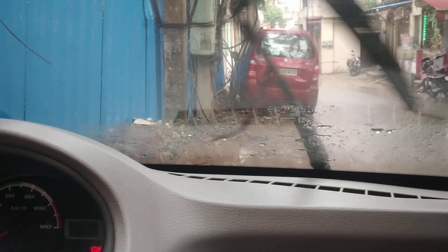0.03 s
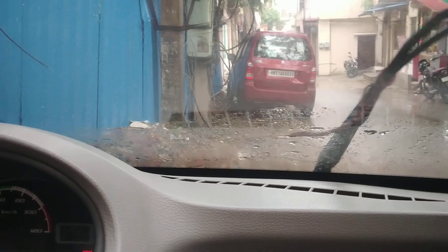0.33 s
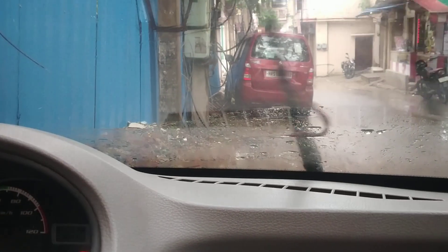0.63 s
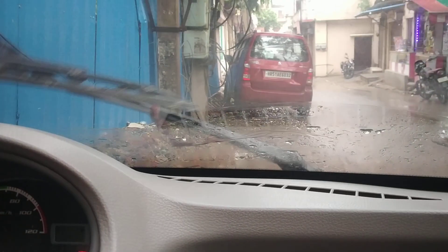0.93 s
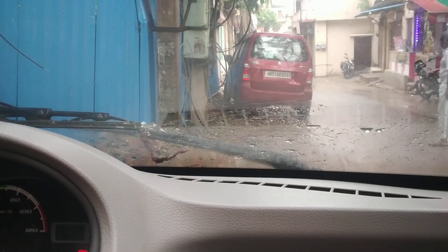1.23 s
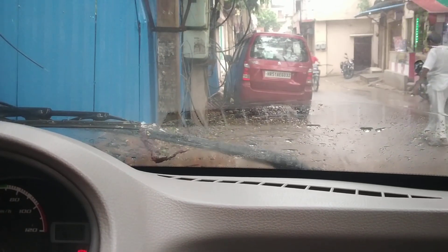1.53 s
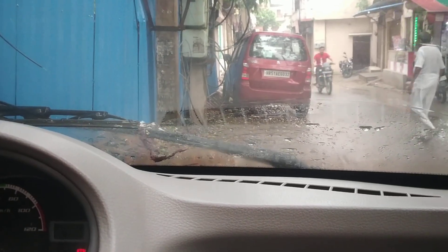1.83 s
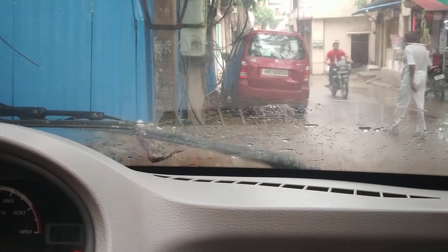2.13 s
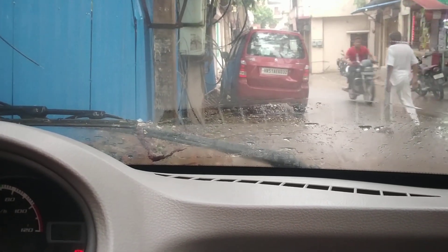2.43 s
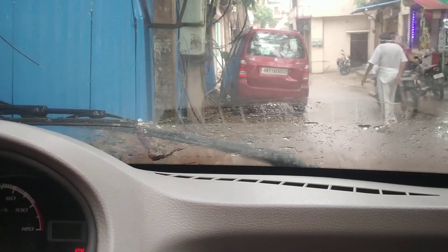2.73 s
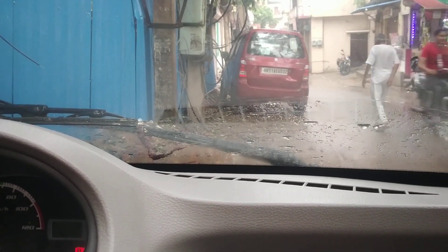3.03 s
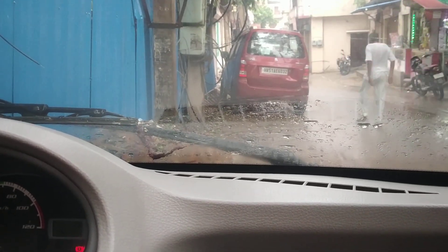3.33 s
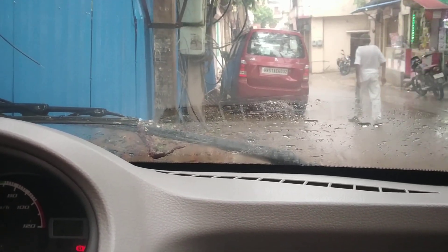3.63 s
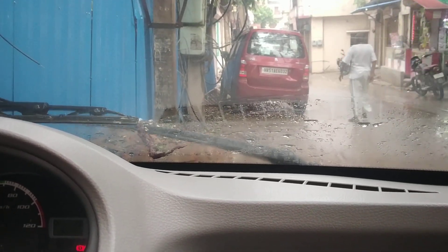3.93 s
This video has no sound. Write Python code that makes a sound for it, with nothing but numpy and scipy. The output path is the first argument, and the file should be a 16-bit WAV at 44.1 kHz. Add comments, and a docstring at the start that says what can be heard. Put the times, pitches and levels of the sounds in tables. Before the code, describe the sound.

Wiper rubber squeaks and groans across the glass and back, then stops, leaving low cabin hum.

```python
"""Squeals, groans and judders: wipers sweep up and down once on a nearly dry windscreen, heard in a parked car.
The rubber squeals while it runs fast, groans as it slows and keeps sticking and slipping,
and judders to a halt at each end. The cabin hums throughout; after the sweep come
a few soft knocks and faint chirps from outside."""
import sys
import numpy as np
from scipy import signal
from scipy.fft import rfft, irfft
from scipy.io import wavfile

SR = 44100
rng = np.random.default_rng(int(sys.argv[2]) if len(sys.argv) > 2 else 0)


def generate_wav(signal):
    """Clip the signal to [-1, 1] and save it as 16-bit WAV at the path in sys.argv[1]."""
    frames = np.transpose(np.atleast_2d(signal))
    scaled = np.clip(frames, -1, 1) * 32767
    pcm = np.round(scaled).astype(np.int16)
    wavfile.write(sys.argv[1], SR, pcm)


N = 176400
T = np.arange(N) / SR
HZ = np.fft.rfftfreq(N, 1 / SR)
TOP_HZ = 15800

# where the rubbing and the cabin sounds sit (frequency [Hz], left minus right [dB])
RUB_BALANCE = [(200, -6.5), (1200, -0.5), (2200, -3), (4400, 7), (8000, 10)]
CABIN_BALANCE = [(60, 2), (180, -5), (550, -6.5), (1650, 2), (4970, 3.5), (15000, -14.5)]


def amp(db):
    """Turns decibels into a gain."""
    return 10 ** (np.asarray(db) / 20)


def unit(x):
    """Scales a signal to an average power of 1."""
    return x / np.sqrt(np.mean(x ** 2) + 1e-20)


def read(points, hz):
    """Looks up a value between a table's frequencies, on a log scale."""
    f, value = np.transpose(points)
    return np.interp(np.log(hz + 1), np.log(f + 1), value)


def place(x, balance):
    """Shares each frequency between left and right, keeping its total power."""
    gains = amp(read(balance, HZ) * np.array([[.5], [-.5]]))
    gains /= np.sqrt(np.mean(gains ** 2, 0))
    return irfft(rfft(x) * gains, N)


def noise(tone):
    """Noise of power 1, shaped by (frequency [Hz], level [dB]) points."""
    return unit(irfft(rfft(rng.standard_normal(N)) * amp(read(tone, HZ)), N))


def wander(rate_hz):
    """A smooth random wobble of power 1, mostly slower than rate_hz."""
    return unit(irfft(rfft(rng.standard_normal(N)) / (1 + (HZ / rate_hz) ** 4), N))


def follow(rows):
    """The samples a table covers, and its columns as curves over them."""
    times, *columns = np.transpose(rows)
    span = slice(max(int(times[0] * SR), 0), int(times[-1] * SR))
    return span, [np.interp(T[span], times, column) for column in columns]


def level(rows):
    """Gain along (time [s], level [dB]) points, silent after the last."""
    return amp(np.interp(T, *np.transpose(rows), right=-150))


def phase_of(hz):
    """Adds up a changing pitch into a wave's angle, in radians."""
    return 2 * np.pi * np.cumsum(hz) / SR


def add(mix, start_s, sound):
    """Adds a sound into the mix at a given time."""
    part = mix[round(start_s * SR):][:len(sound)]
    part += sound[:len(part)]


def panel(x, lowest_hz=140):
    """Stiff panels give off little sound below their lowest note."""
    return signal.sosfilt(signal.butter(5, lowest_hz, "highpass", fs=SR, output="sos"), x)


def from_left(pair, delay_s=.00021):
    """Sound from the left reaches the right side later, by at most a quarter of a wave."""
    lag = np.minimum(2 * np.pi * HZ * delay_s, np.pi / 2)
    return np.array([pair[0], irfft(rfft(pair[1]) * np.exp(-1j * lag), N)])


def reflections(x, ring_s=.075):
    """Glass and trim throw back a dense, very short echo."""
    # echo colour (frequency [Hz], level [dB])
    tone = [(200, -10), (620, -18), (1300, -9), (2700, -4.5), (4500, 2), (15000, 4)]
    t = T[:SR // 4]
    echoes = rng.standard_normal((2, len(t))) * amp(-60 * t / ring_s) * (t > .001)
    echoes /= np.linalg.norm(echoes, axis=1, keepdims=True)
    coloured = irfft(rfft(x) * amp(read(tone, HZ)), N)
    return signal.fftconvolve(coloured, echoes, axes=1)[:, :N]


def cabin_hum(level_db=-40.5):
    """The closed car holds a steady low rumble and a thin hiss."""
    # hum colour (frequency [Hz], level [dB])
    tone = [(25, -35), (96, -32), (133, -10.5), (228, 0), (275, -1.5), (340, -10.5), (390, -4.5),
            (484, -12), (765, -17.5), (1120, -23.5), (1720, -29), (4290, -35), (11600, -39.5), (13300, -27),
            (15600, -39)]
    # how alike left and right are (frequency [Hz], likeness [0-1])
    likeness = [(60, 0.41), (180, 1), (550, 0.53), (1650, 0.032), (15000, 0.037)]
    left, other = noise(tone), noise(tone)
    same = np.clip(read(likeness, HZ), -1, 1)
    right = irfft(same * rfft(left) + np.sqrt(1 - same ** 2) * rfft(other), N)
    return amp(level_db + .25 * wander(rate_hz=35)) * place(np.array([left, right]), CABIN_BALANCE)


def chirps(count=6, start_s=2.445, every_s=.259, length_s=.08, start_hz=4600, fall_hz=700, db=-66):
    """Faint falling chirps repeat somewhere outside."""
    out, t = np.zeros(N), np.arange(0, length_s, 1 / SR)
    for k in range(count):
        hz = start_hz - fall_hz * t / length_s + 200 * wander(rate_hz=300)[:len(t)]
        add(out, start_s + k * every_s, np.sin(np.pi * t / length_s) * np.sin(phase_of(hz)))
    return amp(db) * out


def knocks(rise_s=.0017):
    """Soft knocks on the car, each a dull thud with a click."""
    # knocks (time [s], thud pitch [Hz], thud level [dB], click level [dB], fade time [s])
    hits = [(1.987, 450, -55, -35, 0.0016), (2.533, 454, -24, -41, 0.0077), (2.539, 444, -28, -40.5, 0.012),
            (2.547, 430, -28, -51, 0.023), (3.862, 700, -37, -33.5, 0.0071),
            (3.866, 710, -32.5, -44, 0.0043), (3.875, 587, -30, -67, 0.013),
            (3.928, 800, -42.5, -58, 0.015), (3.959, 296, -34.5, -62, 0.22)]
    # thud colour (frequency [times the pitch], level [dB])
    thud_tone = [(.18, -56), (.44, -1.5), (1, 8.5), (1.7, -3), (3.1, -10), (5.5, -17.5), (18, -55)]
    # click colour (frequency [Hz], level [dB])
    click_tone = [(300, 4), (1200, 10), (2500, 10), (5500, 4.5), (8000, -14), (15000, -8)]
    out, click = np.zeros((2, N)), np.array([noise(click_tone), noise(click_tone)])
    for s, hz, thud_db, click_db, fade_s in hits:
        thud = noise([(multiple * hz, db) for multiple, db in thud_tone])
        envelope = np.clip((T - s) / rise_s, 0, 1) * np.exp(-abs(T - s) / fade_s)
        out += envelope * (amp(thud_db) * thud + amp(click_db) * click)
    return place(out, CABIN_BALANCE)


def drive():
    """The drive rumbles as it moves the wipers."""
    # rumble colour (frequency [Hz], level [dB])
    tone = [(70, -53.5), (180, -14), (300, 3), (600, 5), (1000, -10), (3000, -54.5)]
    # rumble loudness (time [s], level [dB])
    loudness = [(.38, -45), (.44, -36.5), (.55, -33.5), (.6, -62), (.9, -45.5), (1.2, -45), (1.28, -34.5),
                (1.4, -83)]
    return place(noise(tone) * level(loudness), RUB_BALANCE)


def rubbing():
    """Rubber sliding on glass makes a grainy hiss."""
    # hiss colour (frequency [Hz], level [dB])
    tone = [(150, -27), (600, -12), (1300, -12), (2500, -3), (4500, -1), (6500, -4), (8500, -16),
            (15500, -28)]
    # hiss loudness (time [s], level [dB])
    loudness = [(.035, -50), (.08, -44), (.14, -48), (.18, -35), (.22, -35), (.28, -48), (.35, -32),
                (.41, -29), (.445, -54), (.528, -57), (.553, -27), (.585, -61), (.725, -61), (.755, -38),
                (.79, -50), (.825, -39), (.93, -42), (1.07, -47), (1.14, -41), (1.19, -31), (1.235, -30),
                (1.262, -58), (1.33, -80)]
    hiss = np.array([noise(tone), noise(tone)]) * level(loudness)
    grain = unit(amp(2 * wander(rate_hz=230)))
    return place(hiss * grain, RUB_BALANCE)


def thumps(rise_s=.003):
    """The arms turn back and the blades flip over, landing on the glass with short, low notes."""
    # landings (time [s], pitch [Hz], level [dB], fade time [s])
    landings = [(.441, 204, -28, 0.023), (.477, 580, -25, .013), (0.517, 255.6, -16, 0.0074),
                (.537, 220, -13, 0.007), (1.221, 227.6, -25, 0.024), (1.238, 181, -20.5, 0.028)]
    out, t = np.zeros(N), T[:SR // 4]
    for s, hz, db, fade_s in landings:
        envelope = (1 - np.exp(-t / rise_s)) * np.exp(-t / fade_s)
        add(out, s, amp(db) * envelope * np.sin(2 * np.pi * hz * t))
    return place(out, CABIN_BALANCE)


def judder(ring_db=-14.5, scrape_db=-20, rise_s=.00048, scrape_fade_s=.0056):
    """The stalling blade moves in single slips; each scrapes the glass and makes it ring."""
    # slips at the ends of the sweep (time [s], level [dB])
    slips = [(0.393, -11), (.402, -2.5), (0.409, -6.5), (.415, -5), (0.477, -30), (.542, -30),
             (1.192, -10.5), (1.202, -1.5), (1.211, 0.5), (1.2245, -2.5), (1.228, -5), (1.2386, -7.5)]
    # notes of the windscreen and arm (pitch [Hz], level [dB], time to fade by 60 dB [s])
    glass_notes = [(186, -4, .11), (253.6, -1, .065), (315, -1, .072), (420, -9, .08), (537, 0, .028),
                   (902, 3, .053), (1240, -1, .04), (2530, -3.5, .032)]
    out, t = np.zeros(N), T[:SR // 4]
    grit = noise([(150, 6), (1000, 30), (2600, 30.5), (6000, -13), (15000, -54)])
    onset = 1 - np.exp(-t / rise_s)
    for s, db in slips:
        ring = 0
        for hz, note_db, ring_s in glass_notes:
            cycles = hz * t * rng.uniform(.97, 1.03) + rng.random()
            ring += amp(note_db - 60 * t / ring_s) * np.sin(2 * np.pi * cycles)
        scrape = grit[round(s * SR):][:len(t)] * np.exp(-t / scrape_fade_s)
        add(out, s, amp(db) * onset * (amp(ring_db) * ring + amp(scrape_db) * scrape))
    return place(out, RUB_BALANCE)


def groan(path, tone, balance, flutter_db=3.5, rasp=.58):
    """The blade sticks and slips hundreds of times a second; uneven slips sound rough."""
    # strong and weak slips take turns, adding an octave below (time [s], half length [s], level [dB])
    doublings = [(0.226, 0.014, -24.5), (0.347, 0.0098, -24)]
    span, (hz, base_db, overtone_db, rough) = follow(path)
    jitter = .0021 * wander(rate_hz=120)[span] + .027 * rough ** 1.5 * wander(rate_hz=450)[span]
    phase = phase_of(hz * (1 + jitter))
    undertones = [np.exp(-((T[span] - s) / half_s) ** 2) * np.cos(phase / 2)
                  for s, half_s, _ in doublings]
    slip_phase = phase + .015 * wander(rate_hz=450)[span] + .14 * sum(undertones)
    multiples = np.arange(2, 28)[:, None]
    # each overtone swells and fades on its own
    flutter = signal.resample(rng.standard_normal((len(multiples), 12)), len(hz), axis=1)
    gains = amp(read(tone, multiples * hz) + flutter_db * flutter)
    waves = np.cos(multiples * slip_phase + rng.normal(0, 1, multiples.shape))
    overtones = (gains * waves).sum(0) / np.sqrt((gains ** 2).sum(0) / 2)
    overtones *= (1 + rasp * rough * wander(rate_hz=830)[span]) / np.sqrt(1 + (rasp * rough) ** 2)
    base = amp(base_db) * np.cos(phase)
    for undertone, (_, _, db) in zip(undertones, doublings):
        overtones *= 1 + .43 * undertone
        base += amp(db) * undertone
    out = np.zeros(N)
    out[span] = np.sqrt(2) * base + amp(overtone_db) * overtones
    return place(out, balance)


def groans():
    """The blade groans on a falling note as it slows, and on a steady one as it sets off back down."""
    # each groan's course (time [s], pitch [Hz], base note [dB], overtones [dB], roughness [0 = smooth])
    slowing_paths = [
        [(.16, 609.4, -46, -56, 1.05), (.178, 608, -44, -27.5, 0.7), (.195, 586.5, -20, -19.5, 0.76),
         (.225, 587.5, -18, -17, 0.42), (.256, 598.9, -19.5, -13, 0), (.3, 589.6, -23, -17.5, .12),
         (.335, 572.7, -24.5, -18.5, 0.1), (.357, 536.2, -13.5, -19, 0.6), (.39, 489, -21, -17.5, 0.72),
         (.398, 308, -20.5, -21, 1), (.409, 295.2, -16, -31, 0.66), (.422, 272, -25, -47, 0.3),
         (.44, 233, -30, -60, 1)],
        [(1.107, 622, -33, -44, 0.57), (1.121, 606.7, -23, -16, 0.3), (1.15, 607.3, -38, -17, 0),
         (1.167, 576, -26, -19.5, 0.41), (1.18, 561, -23.5, -21, 0.4), (1.195, 470, -29.5, -21.5, 0.8),
         (1.215, 429, -42, -30, 1.2)],
    ]
    return_path = [(.532, 618, -45, -41, 0.94), (.545, 607, -26, -15.5, 0.7), (.56, 626.5, -11, -22, 1),
                   (.575, 628, -14, -17, 0.12), (.595, 620, -11.5, -20, .025),
                   (.634, 636, -14.5, -19.5, .04), (.647, 620.8, -12, -19.5, .02),
                   (.745, 616.7, -13, -20, 0.06), (.765, 604, -26, -33.5, 0.6),
                   (.805, 632, -41.5, -74, 0.43)]
    # overtone colour (frequency [Hz], level [dB])
    slowing_tone = [(900, 3.5), (1200, 6), (1750, 1), (2400, 2.5), (3000, 0.5), (4200, -6), (6000, -8.5),
                    (6800, -14.5), (11000, -27.5), (15500, -35)]
    return_tone = [(1240, 5), (1860, 4), (2480, 0), (3100, 1.5), (4340, -2), (4960, -6), (5600, -11.5),
                   (6250, -11), (7450, -14.5), (8300, -19), (11000, -24), (15500, -34)]
    # where the groans sit (frequency [Hz], left minus right [dB])
    slowing_balance = [(550, -5.5), (1200, 4), (1800, -7), (2500, -6), (3500, 2.5), (5500, 8.5), (9000, 12)]
    return_balance = [(620, -10), (1240, 13), (1860, -6), (2480, -9), (3100, 3.5), (3720, 2.5), (5500, 11),
                      (7000, 14.5)]
    returning = groan(return_path, return_tone, return_balance)
    return returning + sum(groan(path, slowing_tone, slowing_balance) for path in slowing_paths)


def squeals(gain_db=2, jitter=.007, flutter_db=1.8, rasp=.06, chatter_ratio=.28, chatter_jitter=.08):
    """The rubber edge sings a high note that sinks as it slows; chatter, a slower shake, roughens it."""
    # each squeal's course (time [s], pitch [Hz], level [dB], chatter [0-1])
    paths = [
        [(0, 3334, -29.5, 0), (.04, 3194, -40.5, 0.06), (.058, 3000, -28, 0.2)],
        [(.034, 2685, -64, .5), (.04, 2537, -19, 0), (.075, 2486, -23.5, 0.25), (.105, 2350, -21.5, 0.48),
         (.116, 2164, -25, 0.3), (.153, 2126, -22.5, 0), (.168, 2060, -21, 0.1), (.19, 1877, -26.5, 0.95),
         (.21, 1850, -43, 1)],
        [(.803, 2890, -44, .8), (.822, 2935, -25.5, 0.85), (.833, 2889, -20.5, 0.4), (.847, 2836, -19, 0.03),
         (.903, 2831, -20, 0.16), (.92, 2800, -28, 0.6), (.94, 2770, -28.5, 1), (.968, 2777, -25, 0.43),
         (1.003, 2596, -33, 1), (1.029, 2602, -26, 0.22), (1.069, 2487, -20, 0), (1.093, 2346, -38, 0.55),
         (1.103, 2277, -22, 0.55), (1.125, 2060, -48, 0.9)],
        [(.755, 4290, -46, 0.15), (.778, 4400, -37, 0), (.82, 4500, -37, 0.5), (.845, 4290, -45, 0.4)],
    ]
    # the note and its overtones, lowest first (level [dB])
    harmonics = [-1, -4.5, -12.5, -9, -7]
    # side tones that chatter adds round each of them (distance [chatter rates], level [dB])
    side_tones = [(-2, -19), (-1, -18), (1, -10), (2, -10)]
    # how well the glass gives off sound (frequency [Hz], level [dB])
    glass_tone = [(2000, 3), (2800, 4), (4400, -0.5), (5600, -6), (6500, 6.5), (8500, -11.5), (15000, -26)]
    # where the squeals sit (frequency [Hz], left minus right [dB])
    balance = [(2000, -1.5), (2450, -13.5), (2850, -0.5), (4400, 3), (6500, 12)]
    out = np.zeros(N)
    for path in paths:
        span, (hz, db, chatter) = follow(path)
        phase = phase_of(hz * (1 + jitter * wander(rate_hz=300)[span]))
        chatter_phase = phase_of(chatter_ratio * hz * (1 + chatter_jitter * wander(rate_hz=200)[span]))
        side_gains = [(n, chatter * amp(side_db + 3 * wander(rate_hz=150)[span]))
                      for n, side_db in side_tones]
        note = 0
        for k, harmonic_db in enumerate(harmonics, 1):
            sides = sum(gain * np.sin(k * phase + n * chatter_phase) for n, gain in side_gains)
            wave = np.sin(k * phase) + np.sqrt(k) * sides
            note += amp(harmonic_db + read(glass_tone, k * hz)) * wave * (k * hz < TOP_HZ)
        note *= 1 + rasp * wander(rate_hz=2000)[span]
        out[span] += unit(note) * amp(db + flutter_db * wander(rate_hz=144)[span])
    return amp(gain_db) * place(out, balance)


def scene(echo_db=-7):
    """Wipers a little to the left, with knocks, chirps and the cabin's echo and hum."""
    wipers = panel(groans() + judder()) + thumps() + rubbing() + drive() + squeals()
    direct = from_left(wipers) + panel(knocks()) + chirps()
    return direct + amp(echo_db) * reflections(direct) + cabin_hum()


def record(dry):
    """Cuts away the very highest treble."""
    lowpass = signal.firwin(511, TOP_HZ, window=("kaiser", 9), fs=SR)
    return signal.oaconvolve(dry, lowpass[None], "same")


dry = scene()
out = record(dry)
generate_wav(out)
```